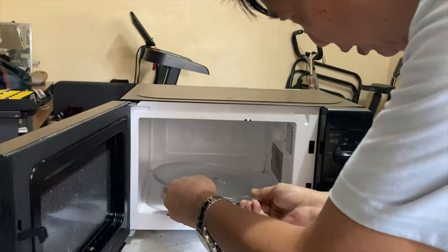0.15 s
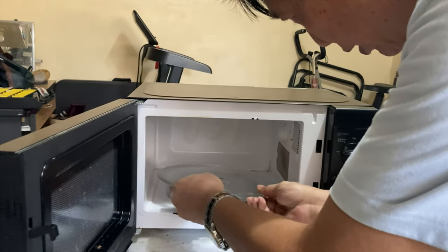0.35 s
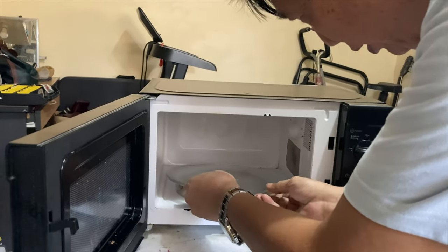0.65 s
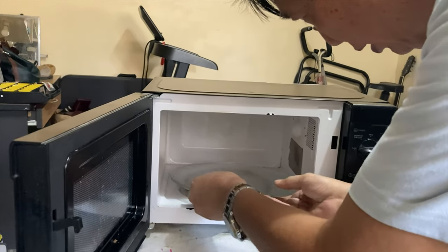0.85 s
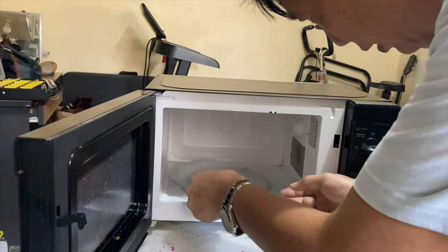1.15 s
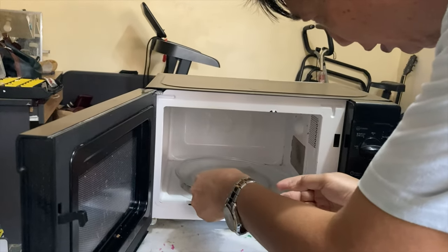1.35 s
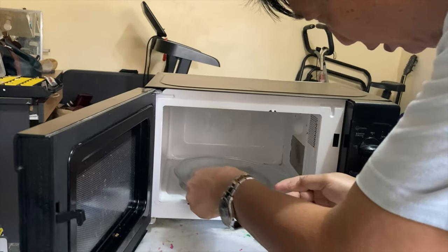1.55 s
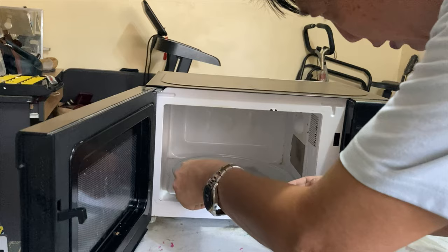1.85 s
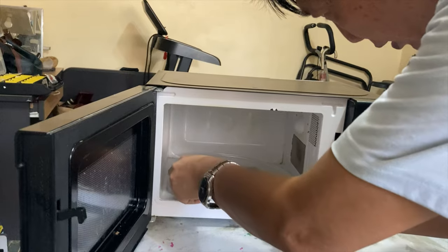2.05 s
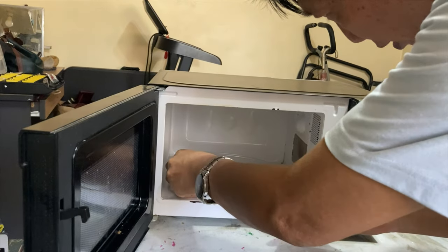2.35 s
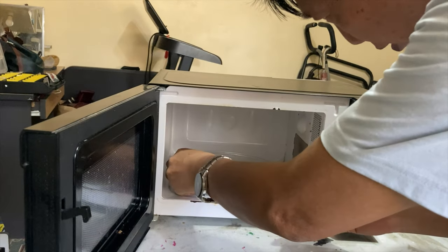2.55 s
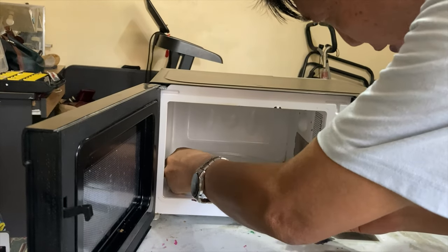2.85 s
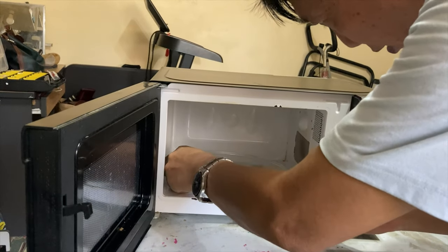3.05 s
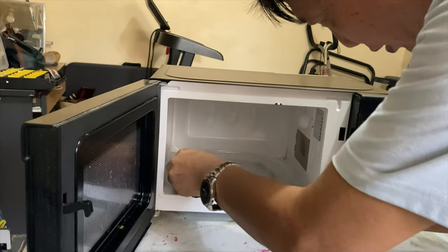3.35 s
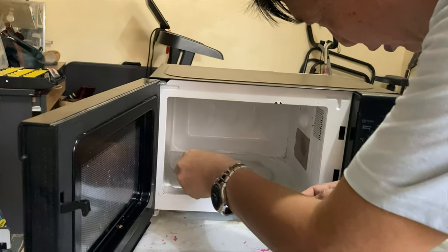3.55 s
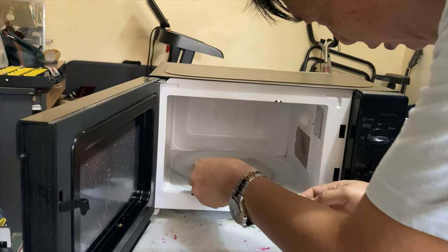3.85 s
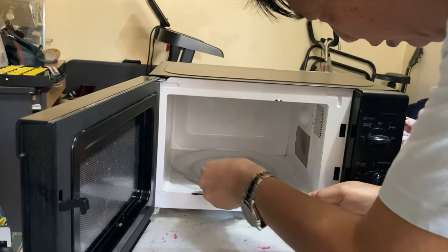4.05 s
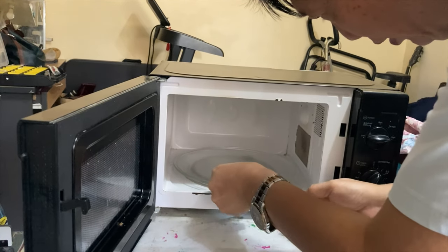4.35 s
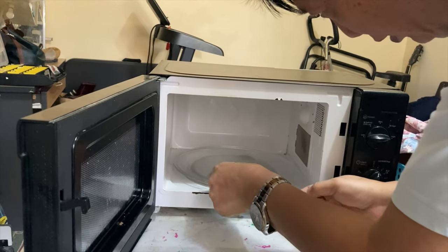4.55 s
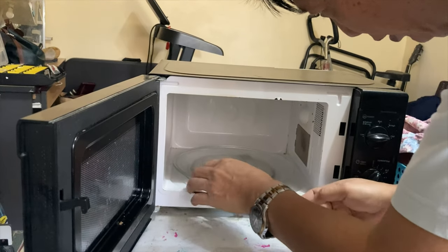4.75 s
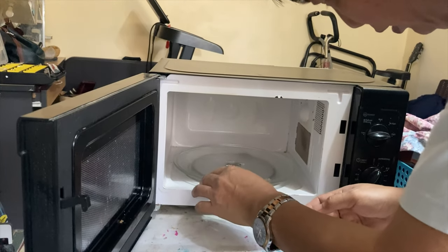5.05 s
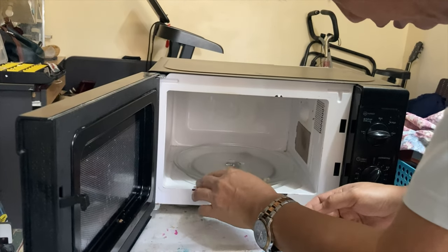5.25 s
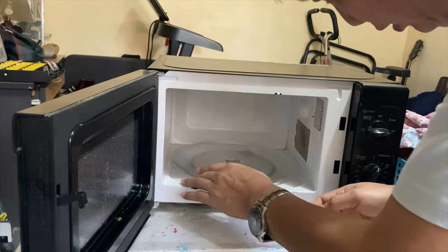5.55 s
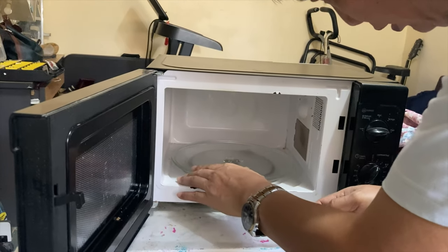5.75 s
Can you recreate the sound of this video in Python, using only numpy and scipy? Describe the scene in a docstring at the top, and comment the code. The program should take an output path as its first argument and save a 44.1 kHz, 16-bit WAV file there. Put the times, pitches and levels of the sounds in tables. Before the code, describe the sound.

Indoors, close to a microwave oven, a glass plate touches down with a dull clack, then a dense cluster of knocks, rattles and hollow steel booms follows around one second. Scattered lighter knocks continue, with another firm clack after four seconds, a brief soft scuff on the right and one last faint knock. Low rumble, faint hiss and a distant accelerating engine lie underneath.

```python
"""A low rumble, a panel drone and a slowly fading hiss fill the house, all made of shaped noise. Over them an
engine outside gathers speed, as climbing overtones, and is gone by 3.9 s; short low thumps come and go. From
0.47 s a glass turntable plate is set into a microwave oven and knocks on the roller ring and the steel cavity:
ringing tones for glass and panels, noise for rattle and small hard room, thickest at 1.0-1.4 s. Near 4.9 s
something scuffs once on the right, as a swish of noise, and a last knock comes at 5.6 s."""
import sys
import numpy as np
from scipy import signal
from scipy.fft import rfft, irfft, next_fast_len
from scipy.io import wavfile
from scipy.ndimage import map_coordinates

SR = 44100
rng = np.random.default_rng(int(sys.argv[2]) if len(sys.argv) > 2 else 0)


def digitize_waveform(pressure):
    """Quantize a signal to 16-bit integers and store it at the path in sys.argv[1].

    Rows of a 2-D input are taken as channels; values are limited to [-1, 1].
    """
    field = np.atleast_2d(pressure).T
    bounded = np.clip(field, -1, 1)
    quanta = np.round(bounded * 32767).astype(np.int16)
    wavfile.write(sys.argv[1], SR, quanta)


N = 260190

# ringing tones of the cavity's steel panels: f/Hz, level/dB, time to fall by 60 dB/s
STEEL_PANELS = [(149, -9.5, 0.76), (203.4, -7.5, 0.2), (235.5, -1, 0.27), (257.95, 2, 0.33),
                (294.8, -3, 0.31), (318.7, -6, 0.37), (379.2, -4.5, 0.27), (451.2, -4, 0.2),
                (500.4, -12.5, 0.4)]
# high ringing tones of the glass: f/Hz, level/dB, time to fall by 60 dB/s before a length factor
GLASS_RIM = [(1786, 14.5, 0.26), (2246, 0.5, 0.27), (2450, -1, 0.15), (2800, 4, 0.17), (3054, 17.5, 0.15),
             (3337, 14, 0.14), (3650, 12.5, 0.13), (4570, 8, 0.24), (5000, 10.5, 0.13), (6000, -14, 0.06),
             (6340, -6, .08), (7190, -14.5, 0.1), (7950, -24, .1)]
# how alike left and right are in the house noise: f/Hz, likeness (1 = the same, 0 = unrelated)
HOUSE_ALIKE = [(60, 0.4), (180, 0.93), (550, 0.48), (1650, -0.21), (4970, 0.088), (15000, -0.11)]
# how far the house noise leans to the left: f/Hz, left over right/dB
HOUSE_LEAN = [(60, -2.5), (240, -1.5), (950, 0.0), (3770, 1.5), (15000, -1)]

BEAT_HZ, BEAT_DEPTH = 25.8, 0.41  # typical beat rate of twin tones, and its depth
LOW_TONES_LEAN_DB = 1.2  # right over left, for the low tones of a knock


def amp(db):
    """Turn decibels into a gain."""
    return 10 ** (np.asarray(db) / 20)


def unit(x):
    """Scale a sound to an rms of 1."""
    return x / np.sqrt(np.mean(x ** 2) + 1e-20)


def along(points, hz):
    """Read a curve of (Hz, value) points on a log frequency axis."""
    f, v = np.transpose(points)
    return np.interp(np.log(hz + 1), np.log(f + 1), v)


def over_time(points):
    """Read a curve of (s, value) points at every sample."""
    s, v = np.transpose(points)
    return np.interp(np.arange(N) / SR, s, v)


def random_curve(length, knots_per_s, t):
    """A smooth random curve through a number of knots, read at the times t."""
    return map_coordinates(rng.standard_normal(length), [t * knots_per_s])


def wobble(rate):
    """A smooth random curve over the whole scene, rate knots a second."""
    return random_curve(int(N * rate / SR) + 4, rate, np.arange(N) / SR)


def filtered(x, response):
    """Change the strength and phase of each frequency in x by a response."""
    m = next_fast_len(x.shape[-1] + 4096)
    return irfft(rfft(x, m) * response(np.fft.rfftfreq(m, 1 / SR)), m)[..., :x.shape[-1]]


def lagged(x, samples):
    """Let the left channel trail the right by some samples; a negative number lets it lead."""
    halves = np.array([[-samples], [samples]])
    return filtered(x, lambda hz: np.exp(1j * np.pi * hz * halves / SR))


def swell(start, rise, hold, fade):
    """Gain that rises, holds at 1 and dies away, all in seconds."""
    t = np.arange(N) / SR - start
    return np.clip(t / rise, 0, 1) ** 2 * np.exp(-np.maximum(t - rise - hold, 0) / fade)


def rush(spectrum, alike, lean):
    """Stereo noise of rms 1, shared between the sides by a likeness and a lean for each frequency."""
    def mid_and_side(hz):
        turn = np.arccos(np.clip(along(alike, hz), -1, 1)) / 2
        return amp(along(spectrum, hz)) * [np.cos(turn), np.sin(turn)]

    mid, side = filtered(rng.standard_normal((2, N)), mid_and_side)
    sides = np.array([mid + side, mid - side])
    return unit(filtered(sides, lambda hz: amp(np.outer([.5, -.5], along(lean, hz)))))


def add_at(out, start_s, sound):
    """Mix a short sound into both channels from a start time."""
    out[:, round(start_s * SR):][:, :sound.shape[-1]] += sound


def near(centre_hz, slope_db, most_db):
    """Where a blow lands picks the loudest tone; the rest lose level per octave away, up to a limit."""
    return lambda hz: -np.minimum(slope_db * np.abs(np.log2(hz / centre_hz)), most_db)


def ring(modes, t, length, attack, weight_db, scatter_db, beat):
    """Dying tones with twins that beat, of new strength, tuning and phase for each blow; peak 1."""
    detune = 0.01  # typical tuning shift, as a share of the frequency
    hz, db, t60 = np.transpose(modes)[:, :, None]
    strength, phase, tuning, beat_rate, beat_phase = rng.standard_normal((5, len(hz), 1))
    level_db = db + weight_db(hz) + scatter_db * strength - 60 * t / (t60 * length)
    twins = 1 + beat * np.cos(2 * np.pi * BEAT_HZ * beat_rate * t + 2 * beat_phase)
    waves = np.sin(2 * np.pi * hz * (1 + detune * tuning) * t + phase / 2)
    x = (amp(level_db) * twins * waves).sum(0) * (1 - np.exp(-t / attack))
    return x / np.abs(x).max()


def muffled(times):
    """Gain of a ring over these times: each later settling of the plate muffles the panels more."""
    # moments when the plate settles: t/s, loss/dB
    settlings = [(1.074, 7), (1.106, 6), (1.18, 5), (1.324, 6), (1.35, 8), (2.39, 8), (2.414, 10),
                 (2.794, 11), (3.09, 5), (3.46, 8), (4.392, 11), (4.424, 6)]
    settle_s = 0.0063
    losses = (db * np.clip((times - s) / settle_s, 0, 1) for s, db in settlings if s > times[0])
    return amp(-sum(losses) + 0 * times)


def rattle(t, length, alike):
    """A crack, uneven chatter and dense echoes: noise whose bands die at their own speeds, peak about 1."""
    # tone colour of the crack: f/Hz, level/dB per Hz
    crack = [(240, -9), (400, 1), (800, 0.5), (1930, -10.5), (3870, -14.5), (5350, -27), (7280, -23.5),
             (11000, -40.5), (16000, -54.5)]
    # how long each band rattles: f/Hz, time to fall by 60 dB/s before the length factor
    band_t60 = [(400, 0.39), (1500, 0.25), (5000, 0.2), (14000, 0.13)]
    # sharp treble at the first touch: f/Hz, level over the rattle/dB
    tick = [(3000, -14.5), (7000, -1), (12000, 15)]
    tick_fade_s = 0.0055
    # a crowd of short modes, one every 45 Hz, that stand out by about 3.5 dB
    peaks_db = 3.5 * rng.standard_normal(int(SR / 2 / 45) + 4)
    noise = filtered(rng.standard_normal((3, len(t))), lambda f: amp(map_coordinates(peaks_db, [f / 45])))
    chatter = amp(3.2 * random_curve(160, 300, t))
    stereo = noise[:2] * np.sqrt(1 - alike) + noise[2] * np.sqrt(alike)
    # split the noise into bands and let each one die away
    hz, s, bands = signal.stft(stereo, SR, nperseg=256)
    fall_db = 60 * s / (length * along(band_t60, hz)[:, None])
    bands = bands * amp(along(crack, hz)[:, None] - fall_db)
    bands = bands * (1 + amp(along(tick, hz))[:, None] * np.exp(-s / tick_fade_s))
    x = signal.istft(bands, SR, nperseg=256)[1][:, :len(t)]
    x = x / (3 * np.sqrt(np.mean(x[:, :600] ** 2)))
    return x * chatter * (1 - np.exp(-t / 0.0021)) * (1 + 0.29 * np.exp(-t / 0.0011))


def knocks():
    """Each hard contact clacks the glass and rattles at once; the steel panels boom up a little later."""
    # hard contacts: t/s, clack level before trims/dB, boom level before muffling/dB, treble loss/dB,
    # loudest panel f/Hz, loudest glass f/Hz, most that other panels lose/dB, extra low buzz of the rattle/dB
    contacts = [(0.469, -20, -33, 37, 207, 740, 6, 2), (0.563, -41.5, -57, 29, 259, 760, 14, 9),
                (1.014, -14.5, -20, 23.5, 225.4, 720, 19, 6), (1.034, -25.5, -20, 30.5, 276, 800, 13, -10),
                (1.111, -15.5, -21, 31, 266, 814, 13, 4), (1.128, -37, -29, 13, 260, 790, 9, -1),
                (1.213, -15.5, -25, 17, 400, 760, 16, 7), (1.231, -21.5, -26.5, 22.5, 264, 1170, 9, -10),
                (1.293, -14.5, -10.5, 24, 247.2, 800, 15.5, 4.5),
                (1.302, -17.5, -18.5, 43, 504, 1140, 25, -1), (1.329, -24, -17, 50, 273, 1310, 15, -4),
                (1.708, -39, -35, 32, 251, 770, 11, -6), (1.917, -38, -39, 32, 235, 760, 8, 9),
                (2.387, -22.5, -15, 28, 242, 770, 19, 0), (2.397, -22, -27, 37, 244, 1074, 10, -2),
                (2.424, -44, -29.5, 19, 404, 790, 13, -7), (2.579, -40, -45, 38, 234, 780, 3, -6),
                (2.724, -16, -16.5, 65, 264, 803, 38, -15), (2.748, -27.5, -41, 30.5, 246, 980, 7, 7.5),
                (3.018, -49, -32, 36, 244, 800, 24, -2), (3.038, -36.5, -35, 37, 244, 696, 20, 3),
                (3.31, -29, -34.5, 43, 285, 764, 21, -13), (3.341, -38.5, -40, 64, 313, 785, 5, 11),
                (3.431, -37.5, -27, 66, 251, 774, 17.5, 6), (3.514, -28, -44, 40, 205, 726, 19, 3),
                (3.937, -37, -40.5, 37, 250, 700, 17, 3.5), (4.121, -28.5, -27, 36, 212, 726, 20, -10),
                (4.186, -28, -50, 40, 240, 810, 15, 4), (4.196, -32.5, -35.5, 32, 204, 1060, 10, 3),
                (4.361, -14, -18.5, 23.5, 236, 900, 13.5, 2.5), (4.363, -22, -43, 45, 236, 636, 12, 7.5),
                (4.372, -18.5, -40, 43, 242, 810, 3, 8), (4.4, -36, -19, 56, 395, 636, 17.5, 2),
                (5.595, -35, -36, 26, 300, 985, 8, -6)]
    # ringing tones of the hand-damped glass plate: f/Hz, level/dB, time to fall by 60 dB/s
    glass_tones = [(580, -14, 0.19), (635, 1.5, 0.16), (708, 2, 0.15), (752.6, 1, 0.17), (796.4, -2, 0.16),
                   (823, 2.5, 0.083), (922, 9, 0.041), (1002, -4, 0.11), (1094, 1.5, 0.1),
                   (1176, -1, 0.098), (1292, -4.5, 0.28), (1400, -18, 0.21), (1480, -6.5, 0.34)]
    glass_lead_db, boom_lag_s = 13, 0.00595
    rattle_under_db, rattle_dulls = 11, 0.18  # rattle below the clack; share of the treble loss it takes
    rattle_length, soft_shortens = 1.244, 0.0045  # length factor, and its loss per dB of treble loss
    high_sides = amp([[0.8], [-0.8]])  # leans left
    low_sides = amp([[-LOW_TONES_LEAN_DB / 2], [LOW_TONES_LEAN_DB / 2]])
    out, t = np.zeros((2, N + SR)), np.arange(2 * SR // 5) / SR
    glass_t = t[:len(t) // 2]
    for s, db, boom_db, loss_db, panel_hz, glass_hz, lead_db, buzz_db in contacts:
        rattle_db = db - rattle_under_db - rattle_dulls * loss_db
        boom = ring(STEEL_PANELS, t, 1.0, 0.0043, near(panel_hz, 170, lead_db), 3, 0)
        boom = amp(boom_db) * boom * muffled(s + t)
        clack = ring(glass_tones, glass_t, 1.0, 0.0007, near(glass_hz, 76, glass_lead_db), 4.5, BEAT_DEPTH)
        clack = amp(db - 4.0) * clack
        clink = ring(GLASS_RIM, glass_t, .45, .0007, np.zeros_like, 4, BEAT_DEPTH)
        clink = amp(rattle_db + 1.5) * clink
        # harder contacts rattle brighter: (Hz, dB)
        hardness = [(450, db - 5.0 + buzz_db), (1100, db - 6.0), (2200, rattle_db + 13.5),
                    (4500, rattle_db + 26.5 - 0.38 * loss_db), (6500, db - loss_db + 28.5)]
        chatter = rattle(t, max(rattle_length - soft_shortens * loss_db, .5), alike=0.59)
        chatter = filtered(chatter, lambda hz: amp(along(hardness, hz)))
        add_at(out, s, high_sides * chatter)
        add_at(out, s, high_sides * clink + low_sides * clack)
        add_at(out, s + boom_lag_s, low_sides * boom)
    return out[:, :N]


def thuds():
    """Soft contacts only push the steel panels, which ring without a clack."""
    # soft contacts: t/s, boom level before muffling/dB, loudest panel f/Hz
    pushes = [(1.056, -14, 266), (1.383, -50, 232), (1.428, -28.5, 139), (1.851, -30, 153),
              (2.283, -33, 282), (2.368, -22.5, 228), (3.499, -27, 205), (4.372, -24, 150),
              (4.408, -30.5, 151)]
    free_under_hz = 170  # thuds centred below this are left to ring unmuffled
    out, t = np.zeros((2, N + SR)), np.arange(2 * SR // 5) / SR
    for s, db, panel_hz in pushes:
        boom = amp(db) * ring(STEEL_PANELS, t, 1, 0.0048, near(panel_hz, 50, 15.0), 2.7, 0)
        if panel_hz > free_under_hz:
            boom = boom * muffled(s + t)
        add_at(out, s, boom)
    return out[:, :N]


def pings():
    """At moments the glass rings free, mostly on one high tone of its rim."""
    # free rings: t/s, level before the waver/dB, loudest rim f/Hz, ring length factor
    free_rings = [(.472, -31, 3320, 0.11), (1.031, -32, 3400, 0.73), (1.124, -28, 2225, 1),
                  (1.13, -41, 4500, 0.68), (1.126, -37, 1860, .25), (1.228, -31, 3300, 0.53),
                  (1.237, -33, 3070, 0.49), (1.297, -27, 2250, 0.43), (3.433, -50, 1820, 0.35),
                  (4.127, -42.5, 3300, 0.78), (4.186, -46, 3320, 0.3), (4.199, -45, 3320, 0.45),
                  (4.198, -35, 1730, 0.11), (4.362, -31, 7190, 1), (4.432, -47, 3320, 0.46),
                  (4.451, -43.5, 3320, 0.87), (5.597, -43, 1770, 0.66), (5.599, -41, 3360, 0.48)]
    out, t = np.zeros((2, N + SR)), np.arange(2 * SR // 5) / SR
    for s, db, rim_hz, length in free_rings:
        waver_db = 2 * random_curve(50, 80, t)  # a random waver in level
        tone = ring(GLASS_RIM, t, length, 0.0035, near(rim_hz, 260, 23.8), 2, BEAT_DEPTH / 2)
        add_at(out, s, amp(db + waver_db) * tone)
    return out[:, :N]


def bright_bursts():
    """Short bright bursts of noise, each in a narrow band, that start fast and die away."""
    # bursts: t/s, level before rise and fall/dB, centre f/Hz
    bursts = [(.47, -41.5, 3330), (1.015, -36, 4700), (1.226, -33, 3620), (1.289, -36.5, 10800),
              (1.296, -41, 2570), (3.036, -59, 3580), (3.309, -51, 3300), (3.51, -54.5, 3600),
              (4.187, -56, 4540), (2.383, -52, 11000), (2.724, -64, 11000), (2.766, -67, 6000),
              (4.36, -31, 6200)]
    width_octaves, t60_s = 0.3, 0.25
    out, t = np.zeros((2, N + SR)), np.arange(2 * SR // 5) / SR
    for s, db, hz in bursts:
        noise = filtered(rng.standard_normal(len(t)),
                         lambda f: np.exp(-(np.log2((f + 1) / hz) / width_octaves) ** 2))
        add_at(out, s, amp(db - 60 * t / t60_s) * (1 - np.exp(-t / .0012)) * unit(noise))
    return out[:, :N]


def plate():
    """All the sounds of glass on rollers and steel; they reach the left side slightly first."""
    return lagged(knocks() + thuds() + pings() + bright_bursts(), -2.8)


def scuff():
    """A short grainy swish of noise with a duller body that starts first; it reaches the right side first."""
    # tone colour of the swish: f/Hz, level/dB per Hz
    swish_colour = [(350, -34), (600, -0.5), (1530, -8.5), (2760, -5), (7730, -23), (11000, -26.5),
                    (15600, -29), (16200, -63)]
    body_colour = [(200, -6.5), (300, -11.5), (380, -2.5), (480, -14.0), (700, -24), (1200, -77)]  # (Hz, dB)
    start_s, rise_s, hold_s = 4.94, 0.093, 0.018
    swish_fade_s, body_fade_s, body_leads_s = 0.075, 0.079, 0.0086
    grain_db = 0.69 * wobble(110) + 0.8 * wobble(35)
    swish = amp(-39 + grain_db) * rush(swish_colour, [(500, 0.26), (3000, 0.14)], [(500, -.6)])
    body = amp(-35.5) * rush(body_colour, [(400, 0.67)], [(400, -1.0)])
    swish = swell(start_s, rise_s, hold_s, swish_fade_s) * swish
    body = swell(start_s - body_leads_s, rise_s, hold_s, body_fade_s) * body
    return lagged(swish + body, 6.84)


def engine():
    """Overtones of the firing rate climb with the revs; each swells as it crosses a wall or room resonance."""
    # loudness of the engine before walls and panning: t/s, level/dB
    loudness = [(0, -44.5), (.5, -40), (1.05, -34), (1.6, -36), (2.2, -42.5), (3.05, -42), (3.9, -74)]
    # what walls and room let through: f/Hz, level/dB
    let_through = [(36, -36.5), (47, -5.5), (58, -24), (68, -36), (80, -9), (93, -18), (103, -2.5),
                   (112, -0.5), (124, -12.5), (134, -16.5), (145, 0), (157, -2.5), (170, -16), (230, -35)]
    firings_hz, gathers_hz_per_s = 20.33, 3.0  # firings a second at the start, and how fast they climb
    t = np.arange(N) / SR
    gate = np.clip((loudness[-1][0] - t) / 0.026 + 1, 0, 1)  # closes after the last time in the table
    hz = firings_hz + gathers_hz_per_s * t
    turns = np.cumsum(hz) / SR
    tones = np.zeros(N)
    for k in range(2, 9):
        strength = amp(along(let_through, k * hz) + 0.69 * wobble(5.43))
        tones += strength * np.sin(2 * np.pi * k * turns + 0.59 * wobble(6.32) + k * k)
    return gate * np.sqrt(2) * amp(over_time(loudness)) * tones * amp([[-2.1], [1.6]])


def drone():
    """The cavity panels drone as noise, louder while the plate drags on its rollers."""
    # tone colour of the drone: f/Hz, level/dB per Hz
    colour = [(110, -95), (190, -1.5), (265, 1), (335, -7.5), (367, -9), (451, -11.5), (900, -22),
              (1170, -43), (1980, -120)]
    # drags of the plate: t/s, hold length/s, level before lumps/dB
    drags = [(0.543, 0.062, -55), (1.018, 0.35, -38), (2.309, 0.077, -40.5), (4.328, 0.021, -60),
             (4.352, 0.03, -62), (5.58, 0.032, -69)]
    rise_s, fade_s = 0.045, 0.15
    dragging = sum(amp(db) * swell(s, rise_s, length, fade_s) for s, length, db in drags)
    lumps_db = 1.8 * wobble(16)
    return (amp(-50.5) + dragging) * amp(lumps_db) * rush(colour, HOUSE_ALIKE, HOUSE_LEAN)


def rumble():
    """Low noise through the walls, with a slight waver in level."""
    # tone colour of the rumble: f/Hz, level/dB per Hz
    colour = [(24, -44), (33, -31), (42, 1), (52, 1), (80, -1), (118, -2), (148, 4), (172, -7.5),
              (220, -11), (290, -41), (480, -120)]
    return amp(-43.5 + 0.34 * wobble(8.1)) * rush(colour, HOUSE_ALIKE, HOUSE_LEAN)


def low_thumps():
    """Short low thumps on the counter, a few cycles each, a little louder on the right."""
    # thumps: t/s, level before panning/dB, f/Hz
    thump_rows = [(0.086, -30, 106), (0.377, -26.5, 111), (3.053, -32, 95), (3.608, -38, 92),
                  (3.721, -34, 69), (4.991, -30, 62), (5.043, -32.5, 64), (5.524, -37, 112)]
    peak_s = 0.011  # time from the start to the strongest point
    out, t = np.zeros(N + SR), np.arange(SR // 4) / SR
    for s, db, hz in thump_rows:
        shape = t / peak_s * np.exp(1 - t / peak_s)
        out[round(s * SR):][:len(t)] += amp(db) * np.sin(2 * np.pi * hz * t) * shape
    return out[:N] * amp([[-1.6], [1.3]])


def hiss():
    """The smooth hiss of the house: noise that flickers a little and slowly gets softer."""
    # tone colour of the hiss: f/Hz, level/dB per Hz
    colour = [(410, -17), (700, 3.5), (1200, 0), (1870, 1.4), (2300, -2.5), (5000, -13.5), (8000, -23),
              (11000, -20.5), (15500, -30.5), (16200, -61)]
    # loudness of the hiss before the flicker: t/s, level/dB
    loudness = [(0, -54), (.9, -53.5), (1.6, -54.5), (2.5, -55.5), (4.5, -56.5), (5.9, -57)]
    flicker_db = .7 * wobble(14)
    return amp(over_time(loudness) + flicker_db) * rush(colour, HOUSE_ALIKE, HOUSE_LEAN)


def scene():
    """Add up all sources, from the plate to the quiet house."""
    return plate() + scuff() + engine() + drone() + rumble() + low_thumps() + hiss()


def record(dry):
    """Keep nothing above a band limit of 16650 Hz."""
    return filtered(dry, lambda hz: hz < 16650)


dry = scene()
out = record(dry)
digitize_waveform(out)
```